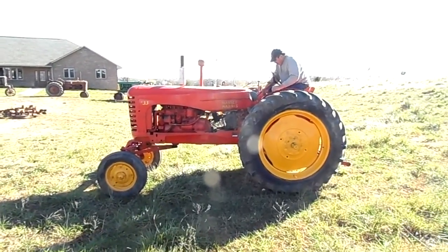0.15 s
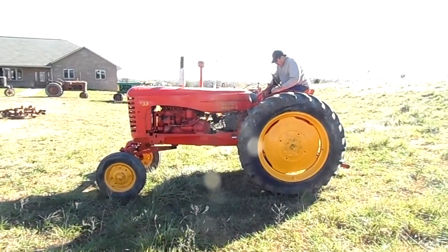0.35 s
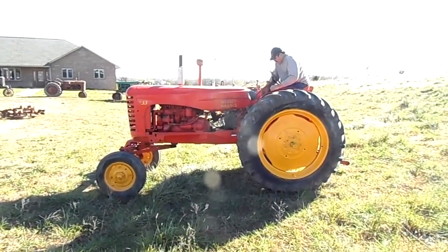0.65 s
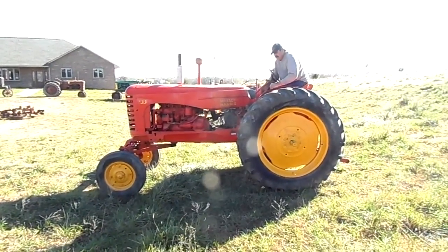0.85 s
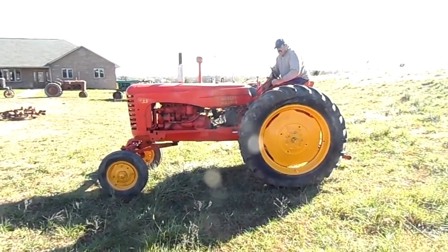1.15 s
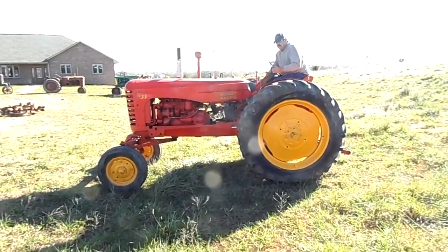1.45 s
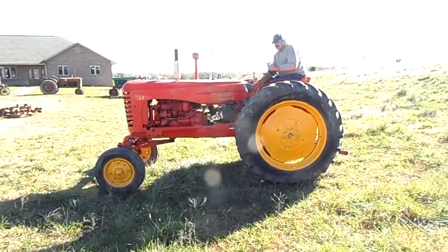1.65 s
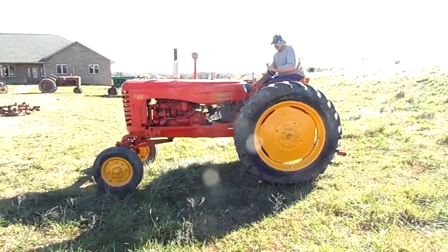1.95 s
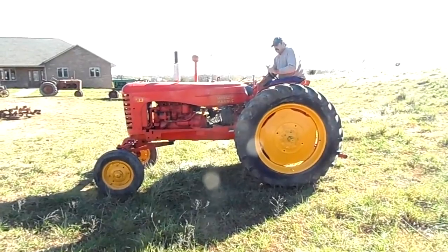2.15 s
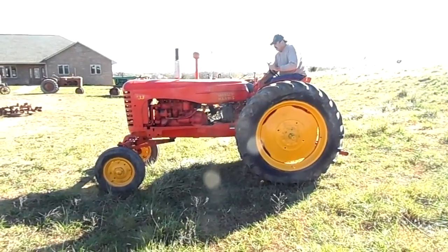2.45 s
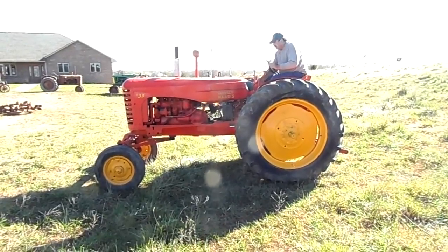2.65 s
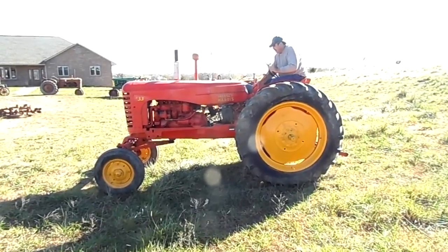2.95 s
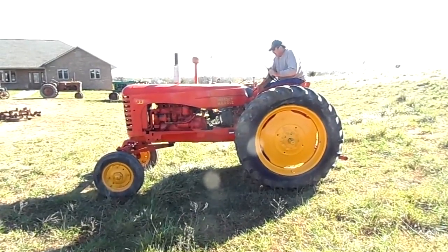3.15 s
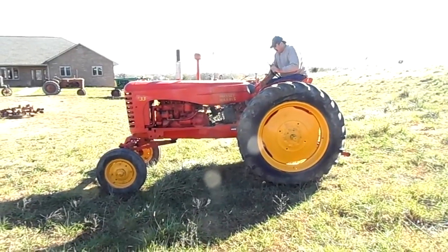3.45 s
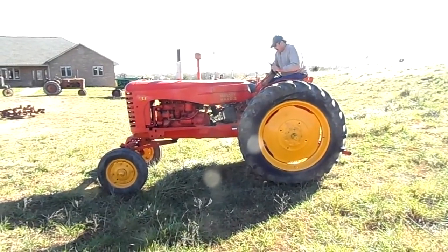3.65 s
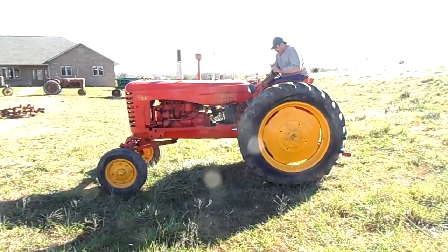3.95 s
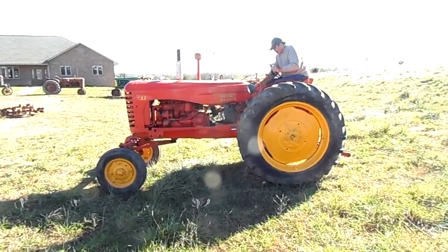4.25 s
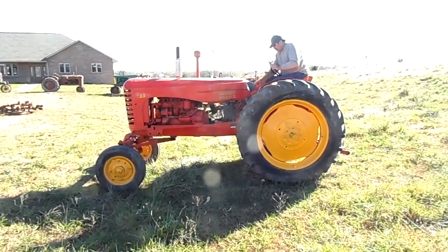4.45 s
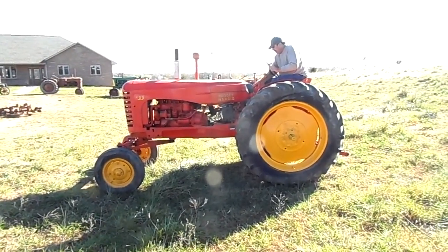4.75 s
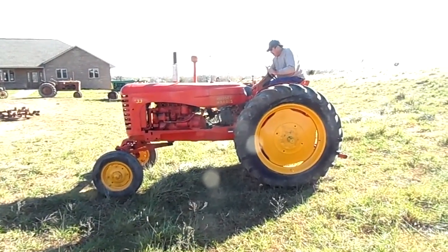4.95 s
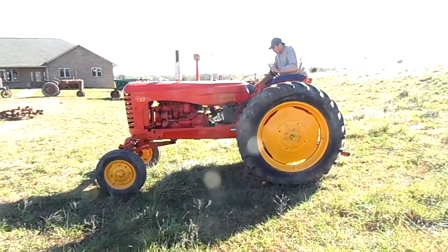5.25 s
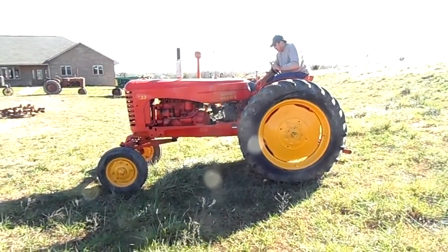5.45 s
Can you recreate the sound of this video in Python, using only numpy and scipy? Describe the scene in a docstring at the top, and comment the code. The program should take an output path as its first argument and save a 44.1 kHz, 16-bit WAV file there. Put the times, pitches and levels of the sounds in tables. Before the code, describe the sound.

Strong wind buffeting dominates the first three and a half seconds, with low thuds and flutters crowding the microphone. Behind it a four-cylinder tractor engine putters without stopping, metallic and slightly lumpy, one beat weaker than the rest. The wind then eases, the engine comes forward clearly, and heavy gusts strike again near the end. Open air, no room echo.

```python
"""On open grass, some metres away, an old four-cylinder petrol tractor runs at about 1000 rpm.
Pulses of gas ring the exhaust stack over a deep hum, and shaped noise makes the hiss of each firing.
Short fading tones are the ticking valves, steady high tones the gear whine, ringing noise the engine block.
Wind rumbles, flutters and slaps on the microphone. The recorder turns itself down at loud peaks,
so the steady engine drops away abruptly and swells back in the lulls."""
import sys
import numpy as np
from scipy import signal
from scipy.fft import rfft, irfft, next_fast_len
from scipy.io import wavfile
from scipy.ndimage import uniform_filter1d, minimum_filter1d, map_coordinates

SR = 44100
rng = np.random.default_rng(int(sys.argv[2]) if len(sys.argv) > 2 else 0)


def master_out(mix):
    """Clip the mix to full scale and print it as 16-bit PCM to the path in sys.argv[1]."""
    frames = np.transpose(np.atleast_2d(mix))
    ceiling = np.clip(frames, -1, 1)
    pcm = np.round(ceiling * 32767).astype(np.int16)
    wavfile.write(sys.argv[1], SR, pcm)


N = 247842

# engine speed, sagging slowly: (time [s], firing rate [firings per second])
ENGINE_SPEED = [(0.0, 33.94), (1.0, 33.91), (2.6, 33.73), (4.1, 33.5), (5.62, 33.15)]
# the cylinders in firing order, relative levels: (thump [dB], bark [dB], hiss [dB])
CYLINDERS = [(4, 2.5, 10), (4, 6.5, 6.5), (5.5, 3.5, 6.5), (-5.5, -9, 8.5)]
# low resonances of the exhaust stack: (frequency [Hz], width [Hz], relative level [dB])
STACK_RESONANCES = [(107, 65, 6), (182.3, 15.5, 12.5), (236, 18, 4), (368, 33, 1)]
# barking resonances of the exhaust stack: (frequency [Hz], width [Hz], relative level [dB])
BARK_RESONANCES = [(584, 72, 4), (654, 50, -7.5)]
# resonances of engine block and bonnet: (frequency [Hz], width [Hz], relative level [dB])
BLOCK_RESONANCES = [(622, 106, 6.5), (1240, 154, -7), (1375, 110, -6), (1590, 25, -18), (2040, 220, -9.5),
                    (2317, 170, -11.5), (2620, 49, -25)]
# gear whine: (multiple of the firing rate [ratio], relative level [dB])
GEAR_TONES = [(20.25, -5.5), (27, -14), (42.2, -4)]
# tones rung by the valve gear, fading by 60 dB in the fade time, relative levels:
# (frequency [Hz], fade time [s], cylinder 0 [dB], cylinder 1 [dB], cylinder 2 [dB], cylinder 3 [dB])
VALVE_TONES = [(1369, 0.075, 4.5, -3, -4, -8), (1982, 0.034, 2, 7.5, 1.5, 1.5),
               (2132, 0.03, 2, 9, -12, -15), (2340, 0.026, 16.5, 3, 1, -8), (2500, 0.02, 6, 16, -14, -10),
               (2652, 0.026, 10, 3, -26, -20), (2675, 0.049, -28, 5, 3, -22),
               (3050, 0.017, -13, -13, -1, -2), (3322, 0.028, 7, 4, -15, -16),
               (3630, 0.035, 0.5, -11, -0.5, -14), (4470, 0.031, -17, -28, -46, 5),
               (5100, 0.03, -3, -41, -40, 6), (6120, 0.022, 9, -11, -25, -13)]
# colour of the gas hiss: (frequency [Hz], relative level per Hz [dB])
HISS_SPECTRUM = [(300, -28), (1000, 0.5), (1800, -3), (2400, 3.5), (3300, 2.5), (4200, 1), (6300, 2),
                 (8000, -1.5), (9200, -7), (10200, -2), (12500, -3), (14000, -1.5), (15700, -15.5)]
# hiss through one firing: (share of the firing after the valve opens [0 to 1], relative level [dB])
HISS_PUFF = [(0, -12), (.025, -5), (.16, -2), (.3, 3), (.5, -3), (.75, -8), (1, -14)]
# the breeze between gusts: (time [s], rumble level [dB], flutter level [dB])
BREEZE = [(0.0, -15, -27), (0.9, -15, -32), (1.2, -16, -24.5), (1.75, -14.5, -28), (2.05, -12, -27.5),
          (3.3, -14, -28), (3.5, -22, -34), (3.9, -26.5, -33), (4.35, -17, -31.5), (4.8, -25.5, -34.5),
          (5.25, -27, -34), (5.62, -9.5, -36)]
# gusts on the microphone: (start [s], length [s], rumble level [dB], flutter level [dB])
GUSTS = [(0.139, 0.046, -11.5, -24), (0.249, 0.027, -11, -9.5), (0.31, 0.13, -13.5, -12),
         (0.456, 0.097, -5.5, -22), (0.681, 0.11, -12, -18), (0.79, 0.025, -0.5, -11.5),
         (0.888, 0.075, -6, -19.5), (1.27, .06, -9.5, -19), (1.42, .05, -9, -17), (1.82, .1, -8, -17),
         (1.933, 0.035, 1, -14.5), (2.053, 0.18, -6.5, -28.5), (2.276, 0.073, -8, -17.5),
         (2.565, .05, 0.5, -24), (2.726, 0.087, -3.5, -21), (3.003, 0.019, -0.5, -18.5),
         (3.109, 0.023, -2.5, -20), (3.22, .11, -2.5, -23.5), (3.588, 0.033, -11.5, -26.5),
         (4.14, 0.07, -18, -23), (4.209, 0.14, -6, -15.5), (4.448, 0.059, -18, -17.5),
         (5.088, 0.032, -23, -25), (5.312, .04, -11.5, -31), (5.353, 0.096, -2.5, -16),
         (5.486, 0.037, 2, -10)]
# colour of the slow wind rumble: (frequency [Hz], relative level per Hz [dB])
RUMBLE_SPECTRUM = [(5, -6.5), (15, -1.5), (28, 1), (45, -1.5), (70, -8), (120, -17), (200, -26),
                   (400, -42.5), (1000, -78.5)]
# colour of the quick wind flutter: (frequency [Hz], relative level per Hz [dB])
FLUTTER_SPECTRUM = [(30, 6), (90, 3), (170, 7), (300, 3.5), (500, -2.5), (800, -16), (1300, -26.5),
                    (2500, -30), (6000, -65)]
# big eddies hitting the microphone, before the recorder:
# (time [s], slap peak [dB], deep thud peak [dB])
SLAPS = [(0.044, -6, -4), (0.255, -4.5, 4), (0.319, -2.5, -9), (0.353, 0, -4), (0.418, -3, -20),
         (0.676, -17, -0.5), (0.757, -6.5, -4), (0.797, 0, 12.5), (1.419, -2, -0.5), (1.462, -5, -9),
         (1.47, -2, 6.5), (1.797, -16, -11), (1.84, -11, 1), (1.868, -6, 3), (1.95, -22, 6), (2.157, -5, 1),
         (2.278, 0.5, -4), (2.3, 0.5, 2), (2.425, -6, -11), (2.772, -14, 0), (2.92, -7, -0.5),
         (2.975, -8, -7), (3.022, -4, -12), (3.283, -4.5, -4), (4.243, -12, -1), (4.299, -0.5, -14),
         (4.329, -3, -6), (4.509, -5.5, -10.5), (5.356, -5, 2), (5.413, -2, 3), (5.502, 4.5, 5)]

# counting starts on the last cylinder; around SKIP_S the beat jumps ahead once
FIRST_FIRING, SKIP_S, SKIP_FIRINGS = 3, 1.78, .77
# gains of the engine's parts at the microphone
BODY_DB, TICKS_DB, HISS_DB = -36.5, -39.5, -40
# how far the deep hum wavers in timing (cycles) and in level (dB)
HUM_WAVER_CYCLES, HUM_WAVER_DB = .05, 1.5
PANEL_ECHO = .06  # strength of one reflection, as a share of the direct sound
GUST_RISE_S, GUST_FALL_S = .03, 0.037  # time to build up or die away by 20 dB
SLAP_LIFE_S, THUD_LIFE_S = 0.00047, 0.0027  # time scale of each pressure push
# peaks above the ceiling turn the recorder down by a share of their excess
CEILING_DB, DUCK_SHARE, START_GAIN_DB = -8.5, 0.92, -10
ATTACK_S, HOLD_S, RECOVERY_DB_PER_S = 0.0016, 0.069, 37.5
TOP_HZ = 15800  # the recorder keeps nothing from here up


def amp(db):
    """Turn decibels into a plain multiplier."""
    return 10 ** (np.asarray(db) / 20)


def unit(x):
    """Scale a sound to an average (rms) strength of 1."""
    return x / np.sqrt(np.mean(x ** 2) + 1e-20)


def curves(rows):
    """Draw straight lines between table rows: one curve for each column after the time."""
    s, *columns = np.transpose(rows)
    return [np.interp(np.arange(N) / SR, s, column) for column in columns]


def wobble(rate):
    """Make a smooth random curve through rate random points a second."""
    points = rng.standard_normal(int(N * rate / SR) + 4)
    return map_coordinates(points, [np.arange(N) * rate / SR])


def filtered(x, response):
    """Change the strength and timing of each frequency in x, as response says."""
    length = next_fast_len(N + SR // 2)  # spare room for ringing tails
    hz = np.fft.rfftfreq(length, 1 / SR)
    return irfft(rfft(x, length) * response(hz), length)[:N]


def noise(spectrum):
    """Make random noise of rms 1, coloured by a spectrum table."""
    f, db = np.transpose(spectrum)

    def colour(hz):
        return amp(np.interp(np.log(hz + 1), np.log(f), db))

    return unit(filtered(rng.standard_normal(N), colour))


def resonate(x, modes):
    """Let x ring a table of resonances, and scale the result to rms 1."""
    def response(f):
        return sum(amp(db) * 1j * f * width / (centre * centre - f * f + 1j * f * width)
                   for centre, width, db in modes)

    return unit(filtered(x, response))


def scatter(starts, shapes):
    """Add up short waveforms, one per row, each from its own start sample."""
    at = np.maximum(starts, 0).astype(int)[:, None] + np.arange(shapes.shape[1])
    return np.bincount(at.ravel(), shapes.ravel(), N)[:N]


def strokes(firing, offset, jitter):
    """Find the sample and cylinder of a once-a-firing event; offset and jitter are in firings."""
    k = np.arange(int(firing[0]), int(firing[-1]))
    moment = k + offset + jitter * rng.standard_normal(len(k))
    return np.interp(moment, firing, np.arange(N)), k % len(CYLINDERS)


def exhaust(firing):
    """Uneven pulses of gas ring the stack, over a deep hum at the firing rate and twice that."""
    thump_db, bark_db, _ = np.transpose(CYLINDERS)
    at, cylinder = strokes(firing, offset=.87, jitter=0.0071)

    def sizes(db):  # every pulse differs a little
        return amp(db[cylinder] + rng.standard_normal(len(at)))[:, None]

    thump = resonate(scatter(at, -sizes(thump_db)), STACK_RESONANCES)
    thump = unit(filtered(thump, lambda f: 1 / (1 + 1j * f / 330) ** 4))  # dull it

    # turbulence around each pulse
    swirl = np.hanning(SR // 60) * rng.standard_normal((len(at), SR // 60))
    pulses = unit(scatter(at, -sizes(bark_db)))
    turbulence = unit(scatter(at - SR / 200, sizes(bark_db) * swirl))
    bark = resonate(pulses + amp(2.0) * turbulence, BARK_RESONANCES)
    bark = resonate(bark, [(600, 220, 0)])  # the silencer makes each bark swell softly

    double_gain = amp(13.0 + HUM_WAVER_DB * wobble(20))
    double_cycles = 2 * firing - .2 + HUM_WAVER_CYCLES * wobble(13)
    hum = double_gain * np.cos(2 * np.pi * double_cycles)
    hum = hum + amp(6.5) * np.cos(2 * np.pi * (firing + 0.33))
    return amp(7.5) * thump + amp(2.0) * bark + np.sqrt(2) * hum


def block(firing):
    """Moving parts shake the block and bonnet with noise, and keep them ringing."""
    shake = amp(0.5 * np.cos(2 * np.pi * (firing - .2)) + 2.06 * wobble(120))
    ring = resonate(shake * rng.standard_normal(N), BLOCK_RESONANCES)

    def middle_band(f):  # weaker below 450 Hz and above 4000 Hz
        return 1 / (1 + (f / 4000) ** 4) * f ** 4 / (f ** 4 + 450 ** 4)

    return amp(2.5) * unit(filtered(ring, middle_band))


def whine(firing):
    """Gear teeth mesh at fixed multiples of the firing rate, blurred by their play."""
    total = 0
    for multiple, db in GEAR_TONES:
        gain = amp(db + 1.86 * wobble(30))
        cycles = multiple * firing + 0.17 * wobble(35)
        total = total + gain * np.sin(2 * np.pi * cycles)
    return total


def valves(firing):
    """Each cylinder's tappets ring the same tones in their own mix, a little different every time."""
    t = np.arange(SR // 20) / SR
    at, cylinder = strokes(firing, offset=.94, jitter=0.03444)
    # blows vary in force, within limits
    force_db = 3.5 * np.clip(rng.standard_normal((len(at), 1)), -2, 1)
    taps = 0
    for hz, fade_s, *cylinder_db in VALVE_TONES:
        size, detune, phase, lag = rng.standard_normal((len(at), 4)).T[:, :, None]
        tone = np.sin(2 * np.pi * (hz * (1 + 0.012 * detune) * t + phase))
        onset = (1 - np.exp(-t / 0.0026)) ** 3
        level_db = np.array(cylinder_db)[cylinder, None] + force_db + 2.4 * size - 60 * t / fade_s
        start = at + 0.000997 * SR * lag[:, 0]  # about 1 ms early or late
        taps = taps + scatter(start, amp(level_db) * tone * onset)
    return unit(taps)


def hiss(firing):
    """Gas spits out as each exhaust valve opens, and fades until the next."""
    since = firing + 0.36  # whole numbers mark the valve openings
    stroke = since.astype(int)
    cylinder_db = np.transpose(CYLINDERS)[2][(stroke - 1) % len(CYLINDERS)]
    size_db = cylinder_db + 1.5 * rng.standard_normal(stroke.max() + 1)[stroke]
    puff_db = np.interp(since % 1, *np.transpose(HISS_PUFF))
    gate = amp(puff_db + size_db + 1.5 * wobble(400))
    return gate * noise(HISS_SPECTRUM)


def panels(x, count=24):
    """Bonnet, wheels and ground throw back weak copies within a few milliseconds."""
    delay_s = rng.uniform(0.00067, .008, count)
    strengths = PANEL_ECHO * rng.choice([-1, 1], count)
    echoes = np.bincount((delay_s * SR).astype(int), strengths)
    echoes[0] += 1  # the direct sound
    return unit(signal.fftconvolve(x, echoes)[:N])


def gusts():
    """Each gust builds, holds and dies away; the stronger of gust and breeze sets the wind level."""
    t = np.arange(N) / SR
    rumble_db, flutter_db = curves(BREEZE)
    for start, length, gust_rumble_db, gust_flutter_db in GUSTS:
        before = (start - t) / GUST_RISE_S
        after = (t - start - length) / GUST_FALL_S
        shape_db = -20 * np.maximum(np.maximum(before, after), 0)
        rumble_db = np.maximum(rumble_db, gust_rumble_db + shape_db)
        flutter_db = np.maximum(flutter_db, gust_flutter_db + shape_db)
    return amp(rumble_db), amp(flutter_db)


def eddies(s, db, life):
    """Each swirl of air is a quick push or pull of pressure, peaking at db, with a slower rebound."""
    u = np.arange(SR // 40) / SR / life[:, None]
    push = u ** 2 * (1 - u / 4) * np.exp(-u)
    heights = rng.choice([-1, 1], len(s)) * amp(db)
    return scatter(s * SR, heights[:, None] * push / push.max())


def wind(count=800):
    """Slow pressure swings rumble, many small eddies flutter, and single big ones slap and thud."""
    rumble_gain, flutter_gain = gusts()
    rumble = noise(RUMBLE_SPECTRUM)
    # even out the random swings, so each gust keeps its strength
    rumble /= uniform_filter1d(np.abs(signal.hilbert(rumble)), size=SR // 40) + 0.018

    place, size, life = rng.standard_normal((count, 3)).T
    times = (np.arange(count) + 0.406 * place) * N / SR / count
    small = eddies(times, 1.93 * size, 0.00071 * np.exp(0.19 * life))
    flutter = unit(small) + amp(-5.5) * noise(FLUTTER_SPECTRUM)
    flutter = unit(amp(3.67 * wobble(45)) * flutter)  # eddies come in clumps

    s, slap_db, thud_db = np.transpose(SLAPS)
    slaps = eddies(s, slap_db, np.full(len(s), SLAP_LIFE_S))
    thuds = eddies(s, thud_db, np.full(len(s), THUD_LIFE_S))
    return rumble_gain * unit(rumble) + flutter_gain * flutter + slaps + thuds


def gain_control(x):
    """A peak over the ceiling quickly turns the gain down; it holds, then creeps back up."""
    hold = max(int(HOLD_S * SR), 1)
    level_db = 20 * np.log10(np.abs(x) + 1e-9)
    needed_db = DUCK_SHARE * np.minimum(CEILING_DB - level_db, 0)
    # the lowest gain needed lately
    held_db = minimum_filter1d(needed_db, size=hold, origin=(hold - 1) // 2)
    # from its lowest point the gain may only climb at the recovery speed
    climb_db = RECOVERY_DB_PER_S * np.arange(N) / SR
    gain_db = np.minimum(np.minimum.accumulate(held_db - climb_db), START_GAIN_DB) + climb_db
    lag = np.exp(-1 / (ATTACK_S * SR))
    smooth_db = gain_db[0] + signal.lfilter([1 - lag], [1, -lag], gain_db - gain_db[0])
    return x * amp(smooth_db)


def scene():
    """Add the tractor's parts, all driven by one running count of firings, to the wind."""
    firing = FIRST_FIRING + np.cumsum(curves(ENGINE_SPEED)[0]) / SR
    skip = np.clip((np.arange(N) / SR - SKIP_S) / .02, 0, 1)
    firing = firing + SKIP_FIRINGS * skip
    body = amp(BODY_DB) * (exhaust(firing) + block(firing) + whine(firing))
    ticks = amp(TICKS_DB) * valves(firing)
    gas = amp(HISS_DB) * panels(hiss(firing))
    return (body + ticks + gas + wind())[None]


def record(dry):
    """The recorder rides its gain, rounds off peaks that slip through and cuts the highest treble."""
    top, hardness = .43, 6  # level that rounded peaks approach; how sharply they bend
    ridden = gain_control(dry[0])
    rounded = ridden / (1 + np.abs(ridden / top) ** hardness) ** (1 / hardness)
    return filtered(rounded, lambda hz: hz < TOP_HZ)[None]


dry = scene()
out = record(dry)
master_out(out)
```